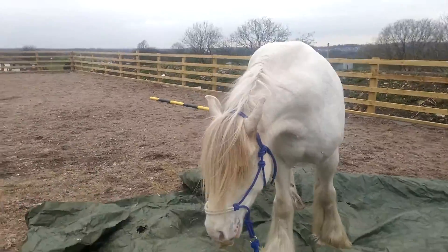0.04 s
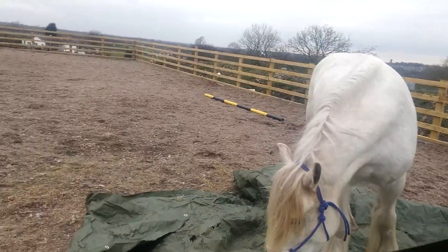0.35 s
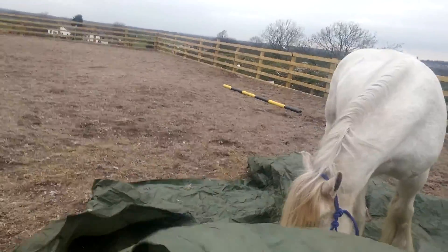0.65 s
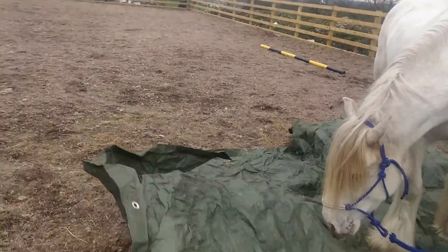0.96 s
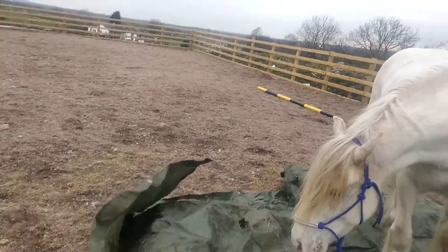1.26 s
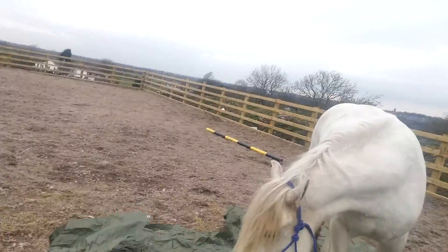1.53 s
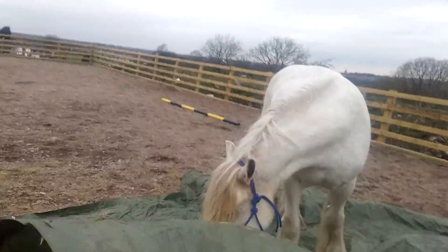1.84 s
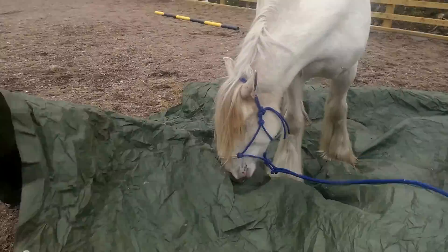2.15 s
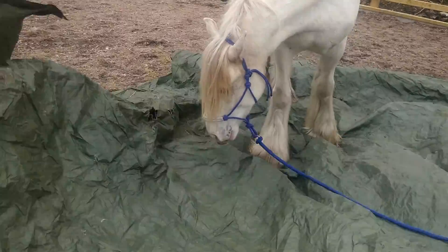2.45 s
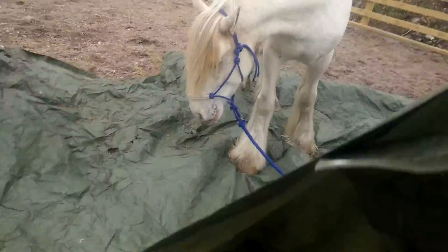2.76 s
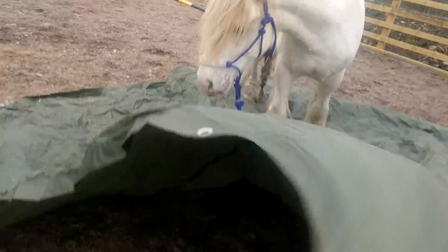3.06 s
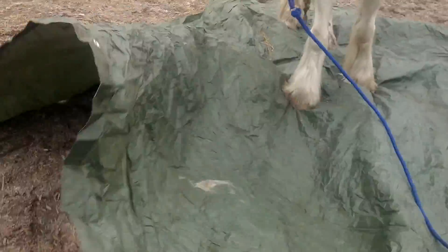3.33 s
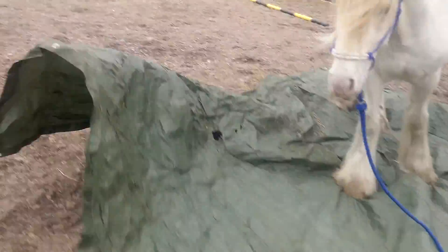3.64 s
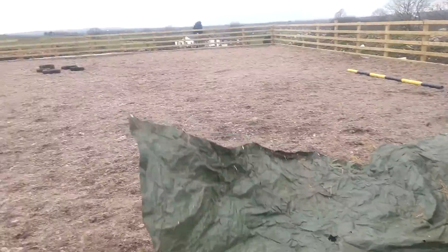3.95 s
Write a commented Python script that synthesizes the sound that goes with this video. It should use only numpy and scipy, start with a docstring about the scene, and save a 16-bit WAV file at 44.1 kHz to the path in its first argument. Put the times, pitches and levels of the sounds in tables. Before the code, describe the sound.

A big plastic tarp crackles and billows in three close shakes, rustling and hissing as it slides over itself in between. A light outdoor breeze rumbles low, and air buffets the microphone, hardest toward the end.

```python
"""A big plastic tarp is shaken three times by its edge, close to a phone in an open paddock.
Each shake pulls the sheet taut: the stiff hem rattles and creases snap over in a burst of crackle.
Around the shakes the sheet billows with a hollow flop, rustles and hisses as it slides over itself.
Puffs of air buffet the microphone ports, mostly the right one, over the low rumble of a light wind."""
import sys
import numpy as np
from scipy import signal
from scipy.fft import rfft, irfft
from scipy.io import wavfile
from scipy.ndimage import uniform_filter1d

SR = 44100
rng = np.random.default_rng(int(sys.argv[2]) if len(sys.argv) > 2 else 0)


def transcribe(u):
    """Save the signal u as a 16-bit wav file named by the first command-line argument.

    u: samples, shape (n,) or (channels, n), limited to [-1, 1]; the rate is SR.
    q: integer samples, one column per channel.
    """
    v = np.clip(np.atleast_2d(u).T, -1, 1)
    q = np.round(v * 32767).astype(np.int16)
    wavfile.write(sys.argv[1], SR, q)


N = 176400
PORT_SPREAD_S = .00011  # spread of left-right arrival lags across the wide sheet


def undb(db):
    """Decibels to gain."""
    return 10 ** (np.asarray(db) / 20)


def unit(x):
    """Scale to rms 1."""
    return x / np.sqrt(np.mean(x ** 2) + 1e-18)


def fader(rows):
    """Gain ride through (time [s], level [dB]) points."""
    times, db = np.array(rows).T
    return undb(np.interp(np.arange(N) / SR, times, db))


def swell(t, peak, half_width):
    """Bell-shaped fade in and out."""
    return np.exp(-.5 * ((t - peak) / half_width) ** 2)


def strike(t, start, decay_s):
    """Instant attack, exponential tail."""
    return (t >= start) * np.exp(-np.minimum(np.abs(t - start) / decay_s, 20))


def eq(x, points, amount=1):
    """Minimum-phase EQ through (frequency [Hz], gain [dB]) points; amount scales the decibels."""
    hz, db = np.array(points).T
    size = 2 * N
    bins_hz = np.maximum(np.arange(N + 1) * SR / size, 1)
    gain = undb(amount * np.interp(np.log(bins_hz), np.log(hz), db))
    cepstrum = irfft(np.log(gain))
    cepstrum[1:N] *= 2  # folded forward, so nothing rings ahead of a click
    cepstrum[N + 1:] = 0
    return irfft(rfft(x, size) * np.exp(rfft(cepstrum)))[..., :N]


def flicker(rate_hz):
    """Smooth random modulation, rms 1."""
    hold = max(int(SR / rate_hz), 1)
    steps = rng.standard_normal(2000)[np.arange(N) // hold % 2000]
    return unit(uniform_filter1d(uniform_filter1d(steps, hold), hold))


def crinkle(per_s, spread_db, ring_s, lag_s, patches=10):
    """Tiny buckles: each patch of sheet has its own short ring, each click its own lag between ports."""
    out = np.zeros((2, N))
    age = np.arange(1024) / SR
    for _ in range(patches):
        chance, size, place = rng.random(N), rng.standard_normal(N), rng.standard_normal(N)
        at = np.flatnonzero(chance < per_s / patches / SR)
        push = undb(spread_db * np.clip(size[at], -2, 2)) * (-1) ** at
        left_lag = np.round((lag_s + PORT_SPREAD_S * place[at]) * SR).astype(int)
        clicks = np.array([np.bincount((at + left_lag) % N, push, N), np.bincount(at, push, N)])
        ring = unit(rng.standard_normal(len(age)) * np.exp(-age / ring_s))
        out += signal.oaconvolve(clicks, ring[None], axes=1)[:, :N]
    return out


# bass-heavy tone of the wind bed (frequency [Hz], gain [dB])
WIND_EQ = [(20, -39), (30, -25), (40, -23), (50, -18), (62, 1), (85, -6.5), (130, -13), (250, -24),
           (600, -22), (1500, -28), (4000, -50), (16000, -55)]


def wind(level_db=-42, swell_db=-1):
    """A light breeze lays a low rumble underneath, partly alike on both ports."""
    air = rng.standard_normal((2, N)) + .7 * rng.standard_normal(N)
    return undb(level_db) * unit(eq(air, WIND_EQ) * undb(swell_db * flicker(9.71)))


# movement of the sheet, the ride for both rustle and panel pops (time [s], relative level [dB])
MOTION_RIDE = [(0, -45), (.12, -39), (.32, -32), (.45, -37), (.52, -37.5), (.66, -41), (.77, -18),
               (.81, -24), (.88, -29.5), (.94, -29), (1.01, -31.5), (1.07, -40), (1.37, -40), (1.45, -29.5),
               (1.6, -35), (1.77, -35.5), (1.82, -29), (1.89, -16), (1.97, -19.5), (2.05, -18.5),
               (2.13, -31), (2.2, -36.5), (2.28, -29), (2.43, -34.5), (2.52, -42.5), (2.62, -38),
               (2.7, -27.5), (2.8, -31.5), (2.92, -26), (2.99, -32.5), (3.1, -30), (3.19, -18), (3.27, -16),
               (3.36, -21.5), (3.41, -21.5), (3.47, -28.5), (3.62, -37.5), (3.78, -35.5), (3.9, -30),
               (4, -26)]
# warm, soft-topped tone of the rustle (frequency [Hz], gain [dB])
RUSTLE_EQ = [(40, -21), (130, -3.5), (280, -5), (520, -7.5), (850, -6.5), (1200, -6.5), (1800, -4),
             (2300, -5), (3000, -10.5), (5000, -18.5), (9000, -25.5), (16000, -34)]


def rustle(trim_db=-2.5):
    """Soft, dull buckling while the sheet moves and settles."""
    clicks = crinkle(per_s=1600, spread_db=1.5, ring_s=.0028, lag_s=.00015) * undb(1.6 * flicker(60))
    return fader(MOTION_RIDE) * undb(trim_db) * unit(eq(clicks, RUSTLE_EQ))


def panel_pops(per_s=330, low_hz=211.4, high_hz=2260, decay_cycles=7.9, trim_db=-3):
    """Taut panels between the folds pop over, each with a brief hollow pitch of its own."""
    age = np.arange(8192) / SR
    out = np.zeros((2, N + len(age)))
    for when, pitch, size, place in rng.random((int(per_s * N / SR), 4)):
        hz = low_hz * (high_hz / low_hz) ** pitch
        lags = np.array([[(4 * place - 1) * PORT_SPREAD_S], [0]])
        cycles = hz * np.maximum(age - lags, 0)
        ring = np.sin(2 * np.pi * cycles) * np.exp(-cycles / decay_cycles)
        at = int(when * N)
        out[:, at:at + len(age)] += ring * np.sqrt(hz) * undb(14.2 * size ** 2)
    return fader(MOTION_RIDE) * undb(trim_db) * unit(out[:, :N])


# ride of the plastic-on-plastic hiss (time [s], level [dB])
SLIDE_RIDE = [(0, -58), (.09, -50), (.13, -37), (.2, -34.5), (.42, -45.5), (.47, -49.5), (.62, -47),
              (.85, -49), (.94, -37), (1.01, -41), (1.06, -64), (1.33, -46), (1.45, -42.5), (1.56, -36),
              (1.72, -49), (1.98, -31), (2.07, -33), (2.19, -43), (2.28, -36), (2.47, -51.5), (2.6, -44.5),
              (2.71, -33), (2.84, -36.5), (2.89, -28), (2.96, -40.5), (3.1, -38.5), (3.25, -26.5),
              (3.4, -32), (3.5, -38.5), (3.65, -42), (3.86, -36.5), (4, -34.5)]
# thin, bright tone of that hiss (frequency [Hz], gain [dB])
SLIDE_EQ = [(300, -47), (2000, -7), (3600, 2), (5500, -1), (7000, -2.5), (9300, 1), (11000, -0.5),
            (13000, -7), (16000, -18.5)]


def slide(tick_db=-9.5):
    """The weave scrapes over itself in a very fine grain, with a few sharper ticks standing out."""
    scrape = crinkle(per_s=8200, spread_db=1.5, ring_s=.00049, lag_s=.0001) * undb(2.6 * flicker(70))
    ticks = crinkle(per_s=63, spread_db=4, ring_s=.00018, lag_s=.0001)
    friction = unit(scrape) + undb(tick_db) * unit(ticks)
    return fader(SLIDE_RIDE) * unit(eq(friction, SLIDE_EQ))


# ride of the high fizz (time [s], level [dB])
FIZZ_RIDE = [(0, -51.5), (.25, -38.5), (.55, -46), (.95, -41), (1.07, -46.5), (1.28, -39.5), (1.6, -44.5),
             (2.2, -50), (2.5, -48), (2.7, -42), (3.65, -52.5), (4, -43)]
# airy tone of the fizz, all top end (frequency [Hz], gain [dB])
FIZZ_EQ = [(1000, -36), (5000, -31), (7000, -2.5), (8500, 0), (10500, -4.5), (13000, -10), (16000, -14)]


def fizz():
    """A faint high fizz carries on between the movements."""
    grains = crinkle(per_s=3000, spread_db=2, ring_s=.0006, lag_s=0, patches=8)
    return fader(FIZZ_RIDE) * undb(1.2 * flicker(39.5)) * unit(eq(grains, FIZZ_EQ))


# cues for the small creases (time [s], level [dB])
TICK_CUES = [(0.089, -26), (1.285, -36), (1.372, -31), (2.117, -19), (2.19, -32), (2.22, -25), (2.272, -25),
             (2.567, -30)]
# pin-sharp tone of their ticks (frequency [Hz], gain [dB])
TICK_EQ = [(1000, -38), (3500, -10), (6500, 3), (10000, 1), (12000, -13), (16000, -12)]


def crease_ticks(t, decay_s=.0012):
    """Small stiff creases tick, thin and bright."""
    envelope = sum(undb(db) * strike(t, start, decay_s) for start, db in TICK_CUES)
    return envelope * unit(eq(rng.standard_normal((2, N)), TICK_EQ))


# cues for single creases snapping over (time [s], level [dB])
SNAP_CUES = [(0.0897, -31.5), (0.6392, -34), (0.682, -14), (0.6978, -13), (0.7493, -11), (0.769, -14),
             (1.1518, -31.5), (1.5537, -19.5), (1.795, -23), (1.825, -13), (2.0047, -18), (2.2641, -17.5),
             (2.5449, -25.5), (2.639, -26), (2.9242, -18.5), (3.0606, -20), (3.24, -19), (3.477, -26),
             (3.6577, -20)]
# mid-forward crack of a crease, for snaps and shakes alike (frequency [Hz], gain [dB])
CRACKLE_EQ = [(40, -7), (150, -11), (350, -2.5), (600, -2), (1000, -1), (1500, -2), (2200, 0), (3200, -6),
              (5000, -10), (9500, -11), (12500, -19.5), (16000, -19.5)]


def crease_snaps(t, decay_s=.0019):
    """Single stiff creases give way with a short crack."""
    out = np.zeros((2, N))
    crack = eq(crinkle(per_s=13000, spread_db=-2, ring_s=.00027, lag_s=.0002, patches=4), CRACKLE_EQ)
    for start, db in SNAP_CUES:
        envelope = strike(t, start, decay_s)
        out += undb(db) * unit(envelope * crack) * np.sqrt(np.mean(envelope ** 2))
    return out


# cues for air hitting the ports
# (peak time [s], half width [s], level [dB], upper edge [Hz], left minus right [dB])
PUFF_CUES = [(.235, 0.018, -29.5, 69, -18), (1.17, 0.022, -35, 77.7, 19), (1.778, 0.012, -21, 95, -19),
             (1.84, 0.022, -27, 90.5, -6), (1.98, 0.047, -31, 110, -5), (2.07, 0.023, -28, 110, 3),
             (2.838, .01, -23, 111, -17), (2.932, 0.035, -19.5, 114, -17), (3.071, 0.0092, -17.5, 111, -12),
             (3.24, 0.09, -20.5, 114, -25), (3.53, 0.042, -21.5, 91, 12), (3.587, 0.0099, -10.5, 170, -26),
             (3.63, 0.018, -17, 111, -21), (3.674, 0.017, -15.5, 306, -41), (3.695, 0.012, -12, 240, -36),
             (3.74, 0.025, -23, 129, -9), (3.777, 0.0022, -16.5, 587, -17), (3.828, 0.022, -10, 138, -20),
             (3.872, 0.046, -12, 108, -30), (3.885, 0.0072, -12, 556, -26), (3.929, .015, -15, 198, -28),
             (3.992, 0.0071, -9.5, 360, -26)]


def air_puffs(t, low_hz=45):
    """Eddies thump the microphone ports; the faster ones reach higher in frequency."""
    out = np.zeros((2, N))
    for peak, half_width, db, edge_hz, pan_db in PUFF_CUES:
        band = signal.butter(2, [low_hz, edge_hz], "band", fs=SR, output="sos")
        envelope = swell(t, peak, half_width)
        eddy = signal.sosfilt(band, rng.standard_normal(N)) * envelope
        port_gains = undb(db + np.minimum([[pan_db], [-pan_db]], 0))
        out += port_gains * eddy * np.sqrt(np.sum(envelope ** 2) / np.sum(eddy ** 2))
    return out


# cues for pulls on the stiff hem (peak time [s], half width [s], level [dB])
HEM_CUES = [(.648, .012, -38), (0.685, 0.0024, -24), (0.716, 0.021, -16), (0.769, 0.0067, -23),
            (1.805, 0.018, -40), (1.858, 0.017, -16.5), (2.8, .08, -38), (3.118, 0.012, -28),
            (3.154, 0.012, -17.5)]
# creaky upper-mid resonances of the hem (frequency [Hz], gain [dB])
HEM_EQ = [(200, -41), (1200, -32), (1750, -8.5), (2050, 4.5), (2350, -5.5), (2700, 1.5), (3300, -23),
          (4300, -19), (6000, -18), (16000, -31)]


def hem_rattle(t):
    """The doubled edge buckles under the pull in a rattle of short bright rings."""
    pull = sum(undb(db) * swell(t, peak, half_width) for peak, half_width, db in HEM_CUES)
    rattle = crinkle(per_s=1500, spread_db=2, ring_s=.003, lag_s=.00036, patches=4)
    return pull * unit(eq(rattle, HEM_EQ))


# cues for surges of crackle, two or three to a shake, as the sheet pulls taut
# (time [s], hold [s], level [dB], release [s], attack [s], treble shelf [dB])
SHAKE_CUES = [(0.695, 0.015, -15, 0.0089, 0.0068, -1.5), (0.715, 0.038, -19.5, 0.02, .008, 6.5),
              (1.826, 0.016, -13, 0.021, 0.0048, -4.5), (1.857, 0.032, -14.5, 0.013, 0.015, 7.5),
              (1.907, 0.032, -21, .006, 0.0094, 4), (3.143, 0.034, -17.5, 0.036, 0.014, 1),
              (3.182, .012, -28.5, .008, .008, 7.5)]


def shakes(t):
    """A wave whips through the sheet and creases snap in dense clusters, brightest at the crest."""
    out = np.zeros((2, N))
    clicks = crinkle(per_s=3000, spread_db=2, ring_s=.0024, lag_s=.0003) * undb(2.7 * flicker(160))
    crackle = unit(eq(clicks, CRACKLE_EQ))
    for hit, hold, db, release, attack, treble_db in SHAKE_CUES:
        rise = np.clip((t - hit) / attack + 1, 0, 1)
        fall = np.exp(-np.maximum(t - hit - hold, 0) / release)
        out += undb(db) * rise * fall * eq(crackle, [(2000, 0), (7000, treble_db)])
    return out


# cues for the sheet bellying out (peak time [s], half width [s], level [dB], hollow pitch [Hz])
BILLOW_CUES = [(.755, 0.027, -26.5, 360), (0.947, .022, -24, 337), (1.005, 0.018, -29, 237),
               (1.89, 0.019, -26.5, 348), (2.02, 0.1, -22, 394), (2.3, .13, -35, 255),
               (3.26, 0.055, -33.5, 268)]
# dark, full body of the big folds (frequency [Hz], gain [dB])
BILLOW_EQ = [(40, -40), (100, 8), (220, 2.5), (380, -9), (600, -6.5), (900, 2), (2000, -10), (16000, -86)]


def billows(t, hollow_db=12):
    """Large folds flop over; the pocket of air under each gives it a hollow pitch."""
    out = np.zeros((2, N))
    flops = eq(crinkle(per_s=330, spread_db=1, ring_s=.0069, lag_s=.00008), BILLOW_EQ)
    for peak, half_width, db, hz in BILLOW_CUES:
        pocket = signal.lfilter(*signal.iirpeak(hz, Q=3.5, fs=SR), flops)
        out += undb(db) * swell(t, peak, half_width) * unit(flops + undb(hollow_db) * pocket)
    return out


# tonal contrast of the ports, partly added left and subtracted right (frequency [Hz], gain [dB])
PORT_EQ = [(60, 3.5), (400, 0.5), (750, 1), (1250, 5), (1800, 7), (2300, 5.5), (2800, -0.5), (3500, 1.5),
           (4600, -2.5), (7000, 0), (11000, 0), (15000, 2.5)]


def scene():
    """The mix: the tarp through two differently coloured ports, with the wind on top."""
    t = np.arange(N) / SR
    left, right = (shakes(t) + hem_rattle(t) + rustle() + panel_pops() + slide() + fizz()
                   + billows(t) + crease_snaps(t) + crease_ticks(t))
    tarp = np.array([eq(left, PORT_EQ, amount=.71), eq(right, PORT_EQ, amount=-.51)])
    return tarp + air_puffs(t) + wind()


def record(dry):
    """The phone soft-clips the loudest peaks and cuts the top."""
    ceiling, top_hz = 1.15, 16000
    rounded = dry / (1 + (dry / ceiling) ** 4) ** (1 / 4)
    high_cut = signal.ellip(10, .1, 90, top_hz, fs=SR, output="sos")
    return signal.sosfilt(high_cut, rounded)


dry = scene()
out = record(dry)
transcribe(out)
```